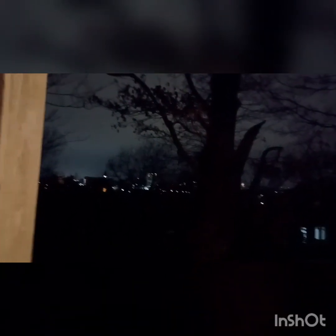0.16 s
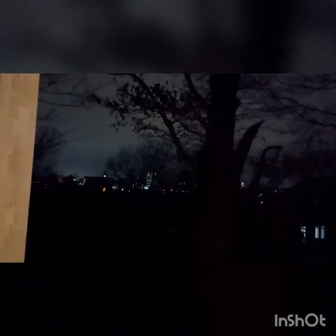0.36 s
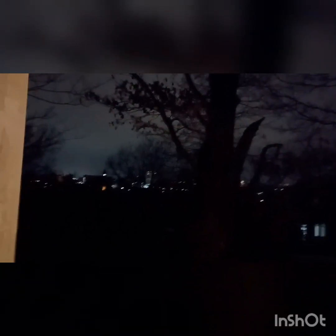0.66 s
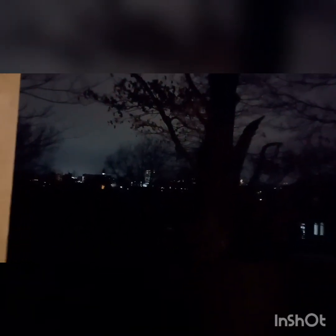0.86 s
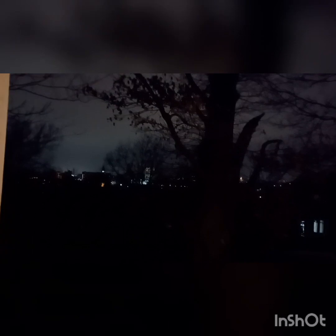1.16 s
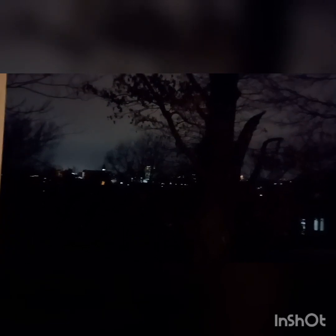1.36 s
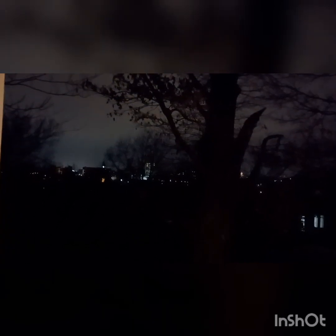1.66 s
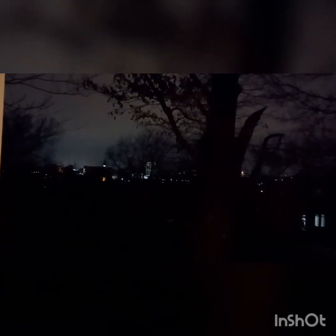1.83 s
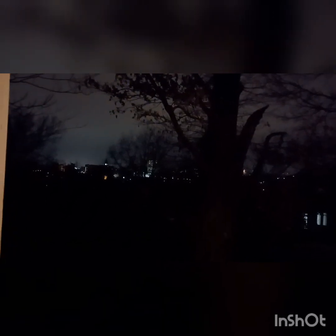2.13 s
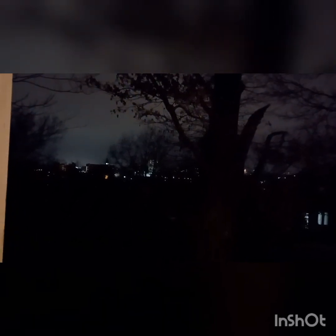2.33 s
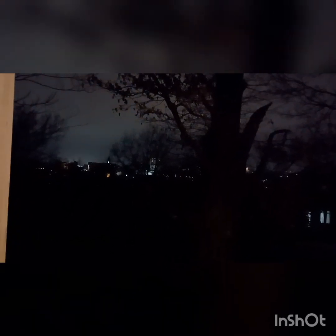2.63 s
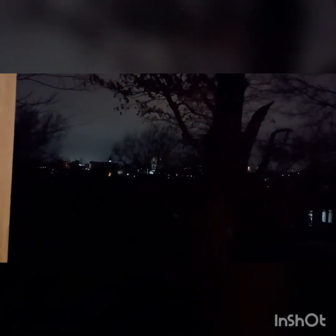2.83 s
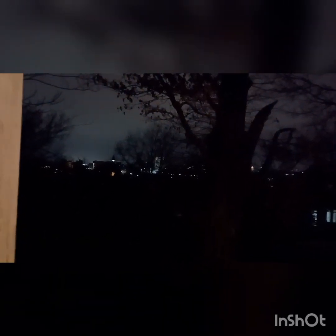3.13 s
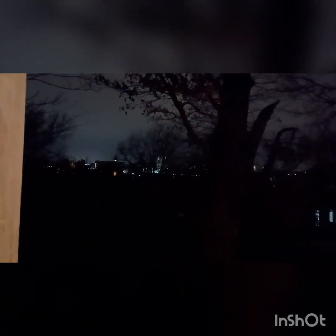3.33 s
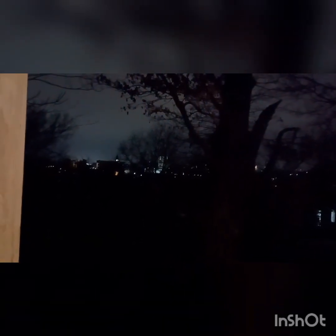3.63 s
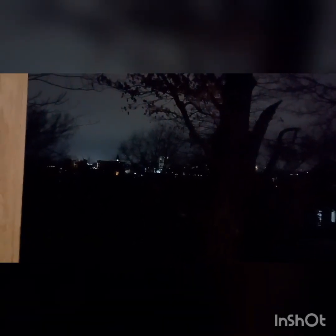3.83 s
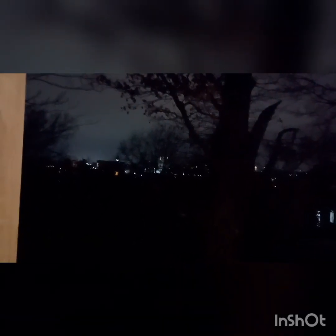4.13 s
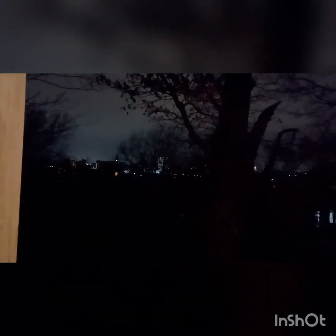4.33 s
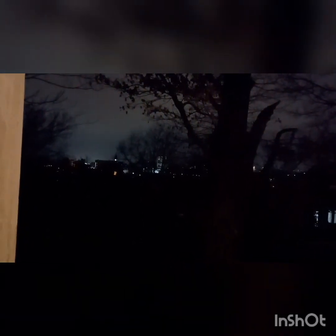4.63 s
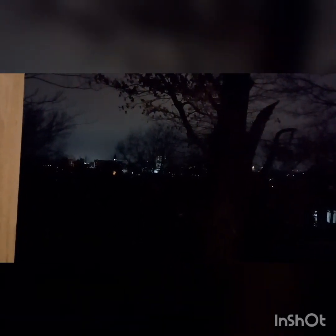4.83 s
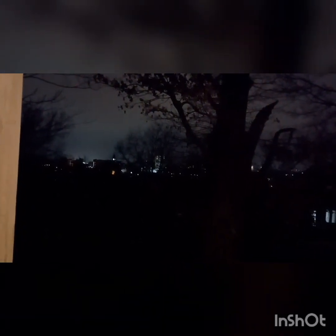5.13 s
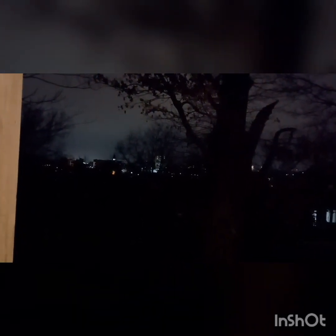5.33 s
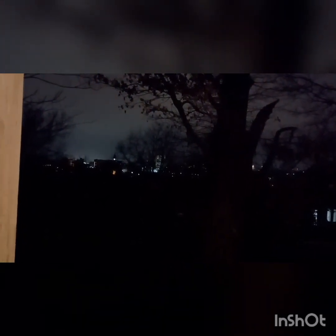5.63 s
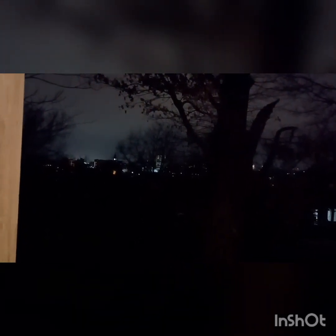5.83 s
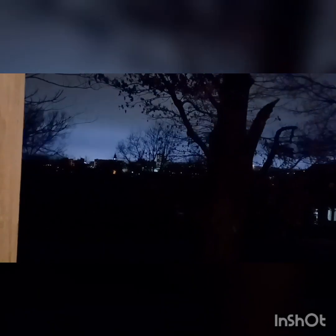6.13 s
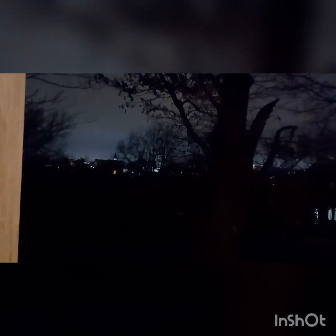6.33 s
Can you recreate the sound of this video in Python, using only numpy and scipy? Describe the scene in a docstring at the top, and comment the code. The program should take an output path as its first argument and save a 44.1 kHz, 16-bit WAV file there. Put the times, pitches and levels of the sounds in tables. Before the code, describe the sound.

A stereo pair in an open doorway hears a rainy night. From 0 to 1.2 s there is mostly soft, bright rain hiss and patter, a few close drops ticking around 0.4 to 0.8 s, and a very faint low rumble. Thunder creeps in at 1.2 to 1.9 s, then swells from 2.1 s into a tumbling run of dull, low claps with rough crackle, strongest around 2.65 to 2.9 s. It falls back to a lingering rumble until a smaller thump near 3.7 s. From 4.2 s deeper booms gather, with a heavy thud at 4.55 s and the hardest, abrupt clap at 5.2 s. Uneven rolling continues, swelling again from 6 s to the cut near 6.5 s. The thunder is dark, muffled by distance and slightly left; the rain hiss fluctuates and becomes fainter than at the start, with occasional near ticks.

```python
"""Night thunder from an open doorway

Thunder rolls in from far away over steady rain, heard by a pair of microphones in the doorway.
The crooked channel sends a dense stream of small shocks, dulled by kilometres of air and smeared by echoes;
a few stretches arrive at once as claps, built from pressure swings with a tearing noise on top.
Rain is shaped noise hissing and pattering all round, with single drops ticking close by."""
import sys
import numpy as np
from scipy import signal
from scipy.fft import rfft, irfft, next_fast_len
from scipy.io import wavfile
from scipy.ndimage import uniform_filter1d, minimum_filter1d

SR = 44100
rng = np.random.default_rng(int(sys.argv[2]) if len(sys.argv) > 2 else 0)


def wav_record(signal):
    """Record a signal, one row per channel, as 16-bit PCM in the file named by sys.argv[1]."""
    frames = np.transpose(np.atleast_2d(signal))
    bounded = np.clip(frames, -1, 1)
    # unit amplitude maps onto the largest positive 16-bit level
    quanta = np.round(bounded * 32767).astype(np.int16)
    wavfile.write(sys.argv[1], SR, quanta)


N = 286209
SIZE = next_fast_len(N + SR)   # transform length, with a second or more of room for tails
HZ = np.maximum(np.arange(SIZE // 2 + 1) * SR / SIZE, 1)


def from_db(db):
    """Decibels to gain."""
    return 10 ** (np.asarray(db) / 20)


def rms_one(x):
    """Scaled to rms 1."""
    return x / np.sqrt(np.mean(x ** 2) + 1e-20)


def at_hz(points):
    """A table of (f, value) on the frequency grid, interpolated over log frequency."""
    f, value = np.transpose(points)
    return np.interp(np.log(HZ), np.log(f + 1), value)


def to_wave(spectrum):
    """Spectrum back to sound, cut to the length of the scene."""
    return irfft(spectrum, SIZE)[..., :N]


def drift(rate_hz):
    """Slow random wander: noise at every 40th sample through a double one-pole low-pass; spread 1."""
    pole = np.exp(-80 * np.pi * rate_hz / SR)
    noise = rng.standard_normal(N // 40 + 2002)
    slow = signal.lfilter([1], [1, -2 * pole, pole * pole], noise)[2000:]   # drop the filter's run-in
    return np.interp(np.arange(N) / 40, np.arange(len(slow)), rms_one(slow))


def clicks(per_s, spread_db):
    """Random clicks of either sign, most small and a few large; rms 1."""
    sizes = from_db(spread_db * np.minimum(rng.exponential(1, N), 4))
    signs = rng.choice([-1, 1], N)
    struck = rng.random(N) < per_s / SR
    return rms_one(sizes * signs * struck)


def overlapping_bands(centres_hz):
    """Triangles on a log-frequency axis that add up to one."""
    return [np.interp(np.log(HZ), np.log(centres_hz), peak) for peak in np.eye(len(centres_hz))]


# Colour of rain and near drops, before the left-right tilt: f/Hz, relative density level/dB
RAIN_COLOUR = [(300, -13.5), (900, 0.5), (1400, -4), (2200, -1.5), (2900, -6.5), (5200, -4.5), (6700, -6),
               (7900, -16), (10000, -13), (12900, -6.5), (14300, -8), (16500, -14.5)]
# Tilt of the rain between the microphones: f/Hz, left over right level/dB
RAIN_TILT = [(1000, 0.7), (8000, 1.2), (13000, -0.4)]
# Loudness of the hiss above 3 kHz, which dips several times: t/s, level/dB
HISS_LEVEL = [(0.0, -51.5), (0.05, -53.5), (1.58, -52.5), (2.22, -53), (2.23, -55.5), (2.72, -56),
              (2.76, -59), (2.77, -63), (3.22, -59), (3.98, -60), (4.2, -55.5), (4.49, -55), (4.9, -56.5),
              (5.19, -55), (5.23, -59), (6.14, -57.5), (6.47, -59)]
PATTER_PER_S, PATTER_SPREAD_DB, PATTER_DB = 1000, 5, -6   # level against the far hiss, before colouring


def rain():
    """Countless far drops blur to hiss in gusty patches; nearer ones patter, each microphone hearing its own."""
    burst = np.exp(-np.arange(120) / 24.0)   # decay in samples, about half a millisecond
    patter = [np.convolve(np.abs(clicks(PATTER_PER_S, PATTER_SPREAD_DB)), burst)[:N] for mic in range(2)]
    far_noise, near_noise = rng.standard_normal((2, 2, N))
    wet = far_noise + from_db(PATTER_DB) * rms_one(np.array(patter)) * near_noise
    colour_db = at_hz(RAIN_COLOUR) + at_hz(RAIN_TILT) * [[.5], [-.5]]
    spectrum = rfft(wet, SIZE) * from_db(colour_db)

    shared_flicker = drift(12)
    bands = overlapping_bands(np.geomspace(400, 14000, 9))
    hiss = np.zeros((2, N))
    for band, flicker_db in zip(bands, np.linspace(.4, 1.1, 9)):   # treble flickers most
        hiss += to_wave(spectrum * band) * from_db(flicker_db * shared_flicker + 0.67 * drift(20))

    treble = signal.sosfilt(signal.butter(4, 3000, "high", fs=SR, output="sos"), hiss)
    t, level_db = np.transpose(HISS_LEVEL)
    return from_db(np.interp(np.arange(N) / SR, t, level_db)) * hiss / treble.std()


# Drops close to the microphones: t/s, level/dB before colouring, left over right level/dB
NEAR_DROPS = [(0.3611, -32.5, -2), (0.558, -33, 1), (0.782, -34, 2), (1.4925, -37, 0.5), (1.9001, -41, -2),
              (2.7016, -42.5, 7), (2.83, -48, 4.5), (4.645, -37.5, 0), (4.7611, -39, -3), (5.473, -36, 0.0),
              (5.686, -54, 2.5), (6.1579, -39, -8)]


def drops():
    """Each near drop is a tick of noise a few milliseconds long, coloured like the rain."""
    out, t = np.zeros((2, N + SR)), np.arange(400) / SR
    ticks = rng.standard_normal((len(NEAR_DROPS), 2, 400))
    for (s, level_db, pan_db), tick in zip(NEAR_DROPS, ticks):
        gains = from_db([[level_db + pan_db / 2], [level_db - pan_db / 2]])
        out[:, round(s * SR):][:, :400] += gains * tick * np.exp(-t / 0.0018)
    return to_wave(rfft(out[:, :N], SIZE) * from_db(at_hz(RAIN_COLOUR)))


# How alike thunder is at the two microphones: f/Hz, likeness (1 = same; below 0 counts as 0)
THUNDER_LIKENESS = [(60, 0.93), (180, 0.99), (550, 0.84), (1650, 0.43), (4970, -0.05), (15000, 0.22)]
RIGHT_LAG_S = .00014


def to_microphones(direct, scattered):
    """The direct spectrum reaches the right microphone a little later; the scattered part differs between them."""
    alike = np.clip(at_hz(THUNDER_LIKENESS), 0, 1)
    lag = np.exp(-2j * np.pi * HZ * RIGHT_LAG_S)
    mid, side = np.sqrt(1 + alike) * direct, np.sqrt(1 - alike) * scattered
    return np.array([mid + side, mid * lag - side]) / np.sqrt(2)


def echoes():
    """Echoes off ground, trees and houses merge into an even wash, here white noise of rms 1."""
    return rng.standard_normal(N)


# Centres of the bands boom, body, crackle, edge: f/Hz
ROLL_BANDS = [95, 220, 530, 1250]
# Colour of the roll within each band: f/Hz, relative density level/dB
ROLL_COLOUR = [(15, -63.5), (25, -44.5), (87, 3), (152, 3), (189, -3.5), (225, 4), (301, -7), (461, -13),
               (594, -19), (707, -22.5), (859, -24), (1060, -30), (1320, -33.5), (1510, -38), (2600, -57),
               (3380, -80.5), (5720, -120)]
# Steady distant rumble in boom, body, crackle, edge: level/dB
FAR_RUMBLE = [-41.5, -40.5, -53.5, -58.5]
# Peals, each from one stretch of the channel:
# t/s, length/s, body level/dB, then boom, crackle and edge level/dB against the body
ROLL_PEALS = [(1.21, 0.57, -35, 2, -16.5, -28), (1.32, 0.13, -31, 0, -20.5, -37),
              (1.508, 0.064, -30, 6, -24, -35), (1.7, 0.052, -28, 5, -17.5, -29),
              (1.76, 0.15, -29, -11, -11, -19.5), (1.93, 0.2, -35.5, -4, -3, -9.5),
              (2.134, 0.12, -18.5, -3.5, -6.5, -25.5), (2.26, 0.094, -21.5, 0, -5, -24),
              (2.408, 0.098, -22, -6.5, -7, -18.5), (2.53, 0.24, -22.5, -7.5, -2.5, -15.5),
              (2.758, 0.059, -19.5, -29, -2.5, -21.5), (2.853, 0.057, -25, -7, -1, -15),
              (2.97, 0.099, -36.5, -3, -2.5, -15), (3.666, 0.07, -34, 6, -4, -23),
              (3.834, 0.12, -33.5, 4.5, -7, -28), (4.078, 0.13, -34, -8, -5, -25.5),
              (4.198, 0.11, -30.5, -1, -5.5, -28), (4.298, 0.062, -26, -2, -14, -30),
              (4.387, 0.15, -23.5, 1, -9, -28), (4.539, 0.034, -22, 5.5, -15, -25.5),
              (4.639, 0.059, -20.5, -4.5, -14.5, -28), (4.728, 0.15, -24.5, 4.5, -9.5, -25),
              (4.921, 0.2, -23.5, -1.5, -10.5, -26), (5.14, 0.058, -26.5, 4, -5, -8.5),
              (5.195, 0.028, -13.5, -16, -11.5, -28.5), (5.28, 0.037, -24, -2, -8.5, -22),
              (5.418, 0.1, -26.5, 0.5, -7, -24), (5.579, 0.14, -26, -7, -13, -29),
              (5.758, 0.091, -23.5, -1.5, -13, -31.5), (5.931, 0.1, -28, -4.5, -6.5, -24),
              (6.044, 0.1, -22.5, -1.5, -5, -19.5), (6.19, 0.084, -23, -5, -4.5, -27.5),
              (6.31, 0.098, -17.5, -7, -8.5, -22), (6.41, 0.11, -15.5, -9, -12, -33)]
RISE_SHARE, PEAL_T60_S = 0.26, 0.52   # a peal swells over this share of its length
AFTER_DB, AFTER_T60_S = -19.5, 5.9   # echoes of the landscape linger after each peal
SHOCKS_PER_S, SHOCK_SPREAD_DB = 900, 0.5   # the rate wanders around this value
ECHO_DB = -1   # echoes against shocks


def roll():
    """One stream of shocks; each peal rises, holds and dies away, and nearer stretches keep more crackle and edge."""
    t = np.arange(N) / SR
    power = from_db(2 * np.array(FAR_RUMBLE))[:, None] * np.ones(N)   # one row per band
    for s, length, body_db, boom_db, crackle_db, edge_db in ROLL_PEALS:
        rise = np.clip((t - s) / (RISE_SHARE * length), 0, 1) ** 2
        after = np.maximum(t - s - length, 0)
        fall = from_db(-60 * after / PEAL_T60_S) ** 2
        linger = from_db(AFTER_DB - 60 * after / AFTER_T60_S) ** 2
        band_db = body_db + np.array([boom_db, 0, crackle_db, edge_db])
        power += from_db(2 * band_db)[:, None] * rise * (fall + linger)

    shocks = clicks(SHOCKS_PER_S * from_db(3.0 * drift(9)), SHOCK_SPREAD_DB)
    direct = rfft(rms_one(shocks + from_db(ECHO_DB) * echoes()), SIZE)
    stream = to_microphones(direct, rfft(echoes(), SIZE)) * from_db(at_hz(ROLL_COLOUR))
    bands = [rms_one(to_wave(stream * band)) for band in overlapping_bands(ROLL_BANDS)]
    return sum(np.sqrt(p) * band for p, band in zip(power, bands))


# Colour of the tearing crack: f/Hz, relative density level/dB
CRACK_COLOUR = [(250, -13), (500, 6.5), (900, -6.5), (1500, -15.5), (2000, -25.5), (2700, -58.5),
                (5000, -100)]
# Claps: t/s, swing level/dB before the air, starting f/Hz, t60/s,
# crack level/dB against the swings, crack t60/s
THUNDER_CLAPS = [(1.396, -18, 145, 0.16, -45, 0.31), (1.939, -13, 126, 0.12, -20, 0.54),
                 (2.163, -12.5, 252, 0.095, -36, 0.19), (2.229, -19, 134.5, 0.15, -25, 0.28),
                 (2.429, -6.5, 159, 0.059, -28, 0.49), (2.649, -5, 130.4, 0.083, -11, 0.14),
                 (2.76, 1.5, 208.5, 0.079, -21, 0.25), (2.862, -3, 201.4, 0.081, -25, 0.42),
                 (3.675, -11, 117.3, 0.038, -26, 0.15), (3.841, -25.5, 121, 0.024, -12, 0.23),
                 (4.216, -9.5, 103, 0.15, -31, 0.46), (4.382, -13.5, 98.3, 0.17, -30, 0.26),
                 (4.559, -0.5, 108, 0.086, -28, 0.1), (4.642, -11.5, 88, 0.051, -39, 0.31),
                 (4.743, -10, 97, 0.086, -27, 0.28), (5.189, 6.5, 192, 0.051, -22, 0.22),
                 (5.205, 0.5, 225.5, 0.082, -19, 0.084), (6.053, -13.5, 121, 0.14, -14, 0.25),
                 (6.355, -21, 230, 0.11, -21, 0.19)]


def claps():
    """Each clap is a few pressure swings that rise fast and die away, with a tearing crack on top."""
    swings_sum, tearing = np.zeros(N + SR), np.zeros(N + SR)
    t = np.arange(SR // 2) / SR
    rise = (1 - np.exp(-t / 0.005)) ** 2
    chances = rng.random((len(THUNDER_CLAPS), 2))   # random starting phases
    for (s, level_db, hz, t60, crack_db, crack_t60), chance in zip(THUNDER_CLAPS, chances):
        phase = 2 * np.pi * (hz * t * (1 - 2.3 * t) + chance[0])   # swings slow down as they fade
        swings = np.sin(phase) + 0.51 * np.sin(2.1 * phase + 2 * np.pi * chance[1])
        fade = from_db(level_db - 60 * t / max(t60, .02))
        crack_fade = from_db(level_db + crack_db - 60 * t / max(crack_t60, .02))
        start = round(s * SR)
        swings_sum[start:][:len(t)] += swings * rise * fade
        tearing[start:][:len(t)] += rise * crack_fade

    direct = rfft(swings_sum[:N], SIZE) / (1 + (HZ / 900) ** 4)   # the air takes the sharp corners off
    scattered = direct * rfft(rng.standard_normal(400), SIZE) / 20   # smeared over 400 samples
    thumps = to_wave(to_microphones(direct, scattered))
    crack_noise = to_microphones(rfft(echoes(), SIZE), rfft(echoes(), SIZE))
    cracks = rms_one(to_wave(crack_noise * from_db(at_hz(CRACK_COLOUR))))
    return thumps + tearing[:N] * cracks


LEFT_DB = 1   # thunder, left over right


def scene():
    """Rain all round, and thunder a little louder on the left."""
    thunder = (roll() + claps()) * from_db([[LEFT_DB / 2], [-LEFT_DB / 2]])
    return rain() + drops() + thunder


CUTOFF_HZ = 15700
CEILING, RELEASE_DB_PER_S = .98, 60   # limiter threshold, before the top is cut


def record(dry):
    """Small microphone ports lose the deep bass, a look-ahead limiter holds the peaks, the top is cut."""
    thin = signal.sosfilt(signal.butter(4, 40, "high", fs=SR, output="sos"), dry)
    peaks = np.abs(thin).max(axis=0)
    over_db = np.maximum(20 * np.log10(peaks / CEILING + 1e-9), 0)
    ramp = RELEASE_DB_PER_S * np.arange(N) / SR
    held_db = np.maximum.accumulate(over_db + ramp) - ramp   # instant attack, steady release
    gain_db = uniform_filter1d(minimum_filter1d(-held_db, size=441), size=441)   # 10 ms windows look ahead
    top_cut = signal.ellip(12, .3, 70, CUTOFF_HZ, fs=SR, output="sos")
    return signal.sosfilt(top_cut, thin * from_db(gain_db))


dry = scene()
out = record(dry)
wav_record(out)
```